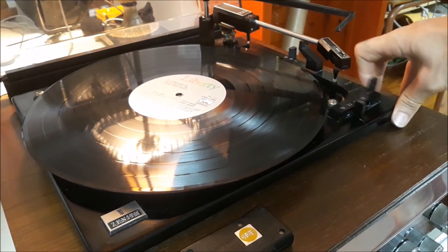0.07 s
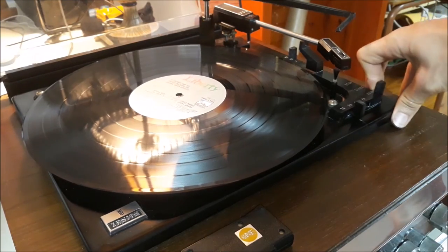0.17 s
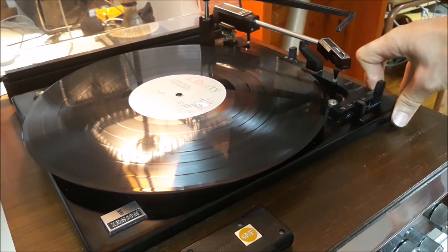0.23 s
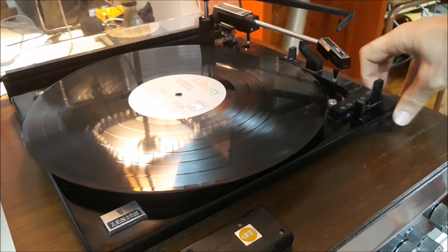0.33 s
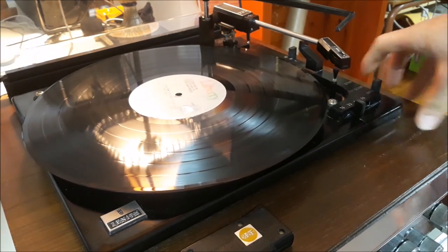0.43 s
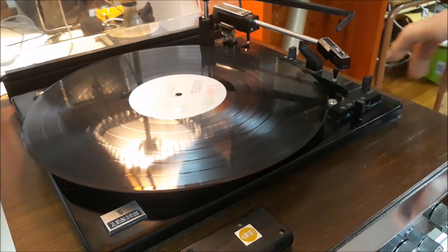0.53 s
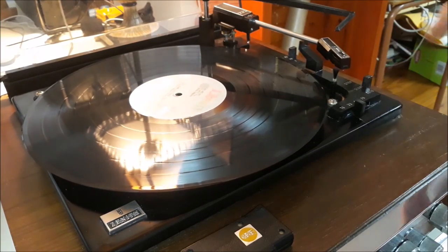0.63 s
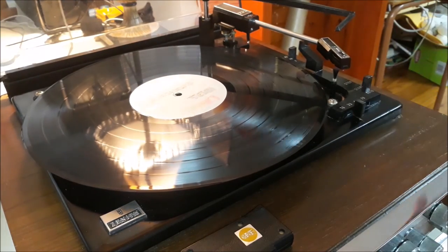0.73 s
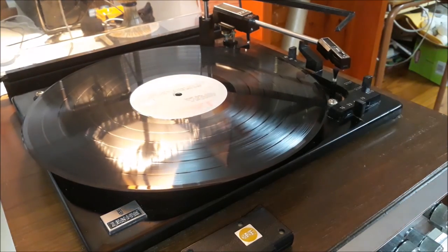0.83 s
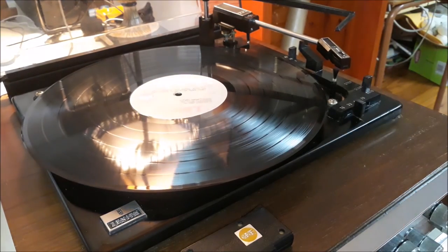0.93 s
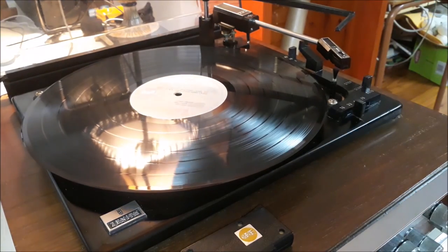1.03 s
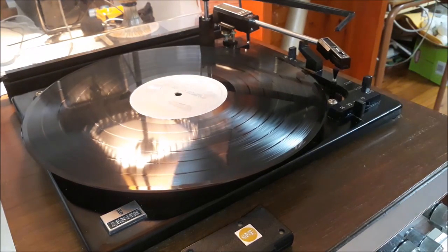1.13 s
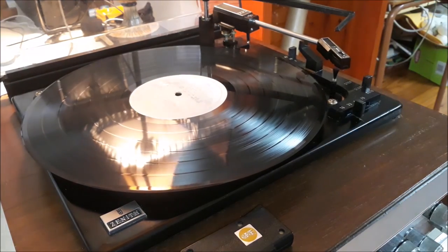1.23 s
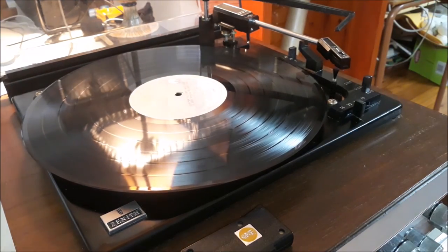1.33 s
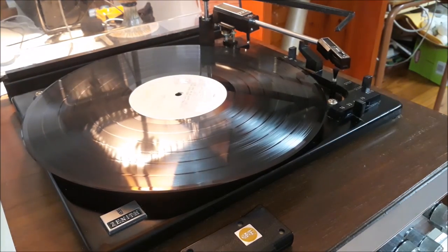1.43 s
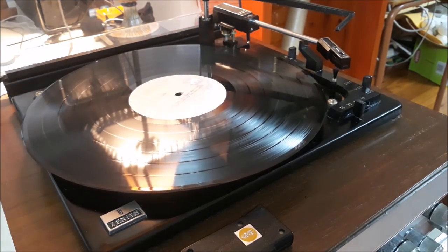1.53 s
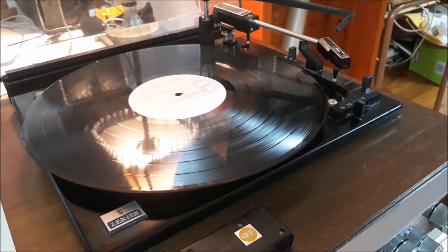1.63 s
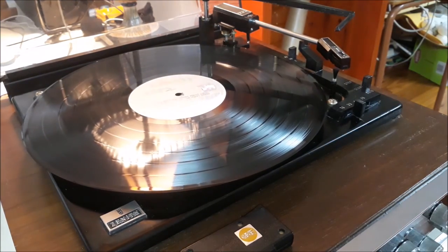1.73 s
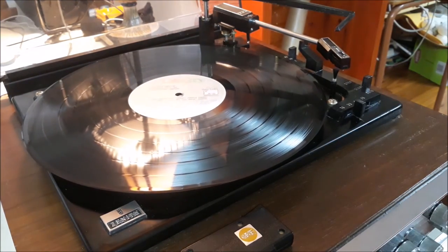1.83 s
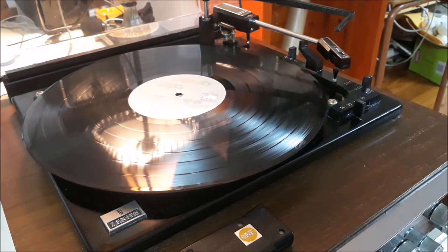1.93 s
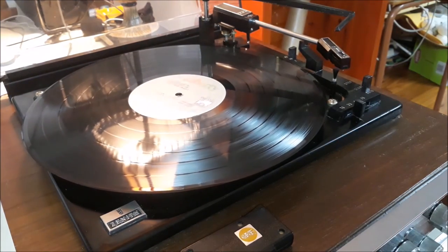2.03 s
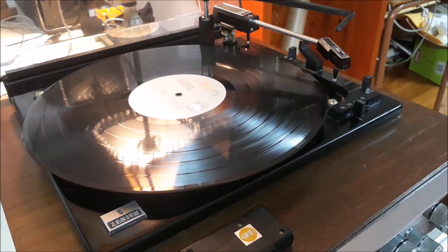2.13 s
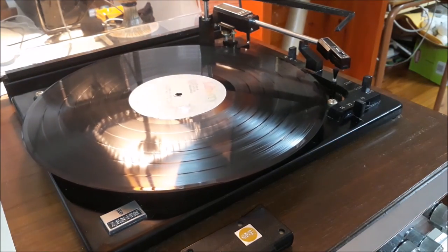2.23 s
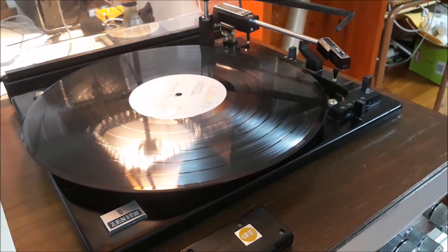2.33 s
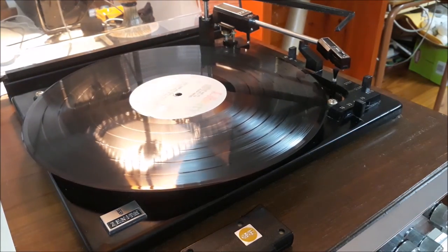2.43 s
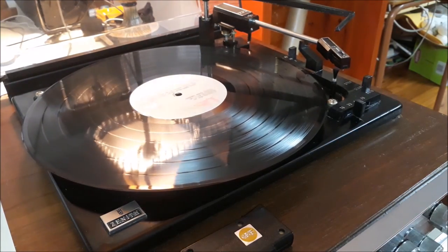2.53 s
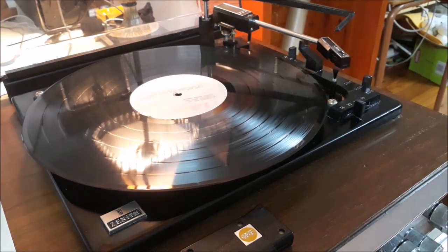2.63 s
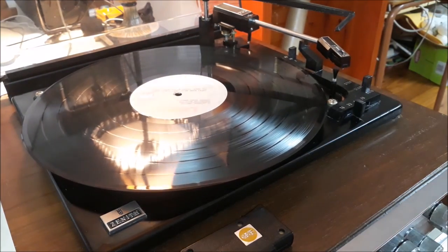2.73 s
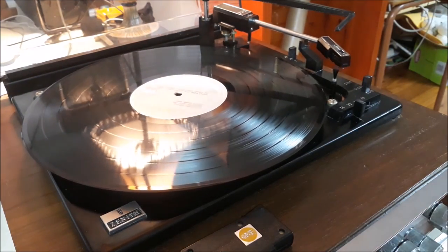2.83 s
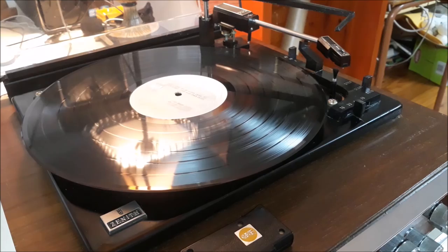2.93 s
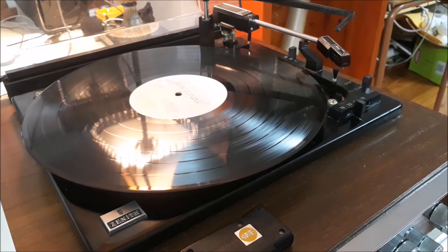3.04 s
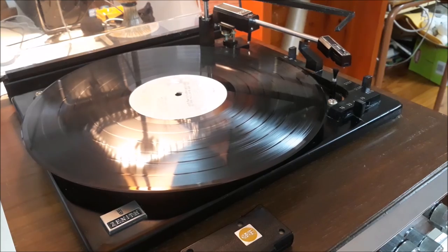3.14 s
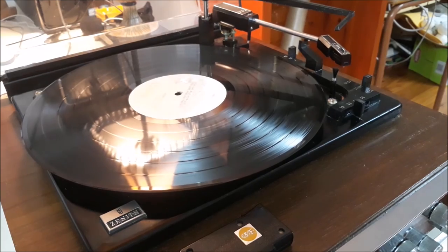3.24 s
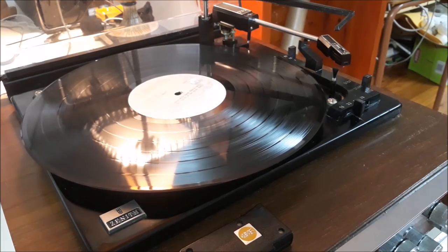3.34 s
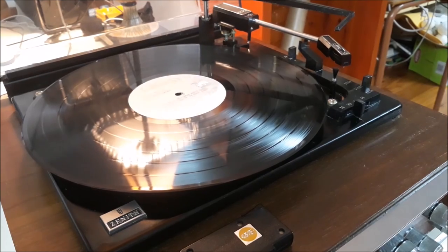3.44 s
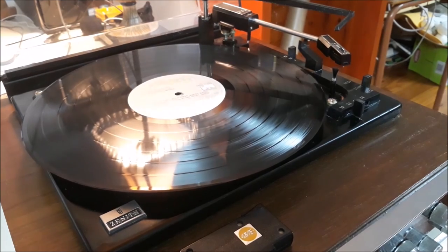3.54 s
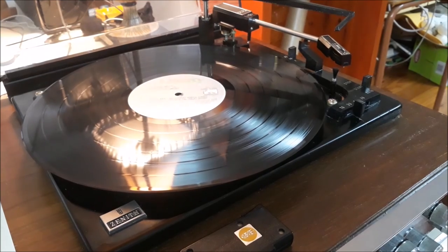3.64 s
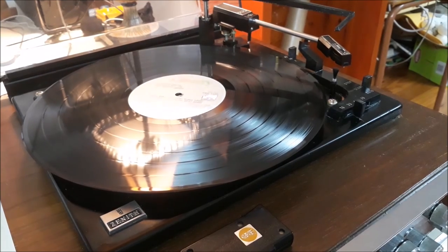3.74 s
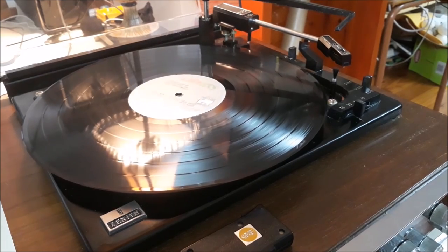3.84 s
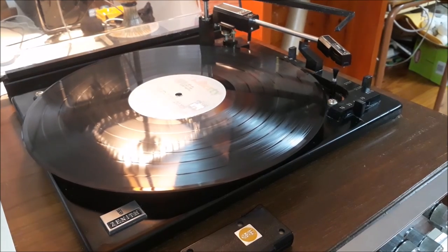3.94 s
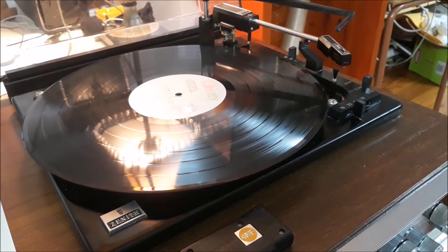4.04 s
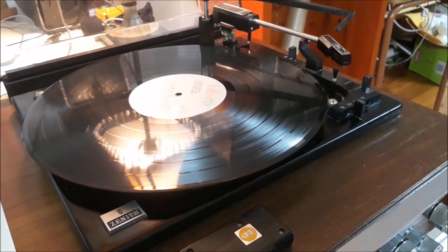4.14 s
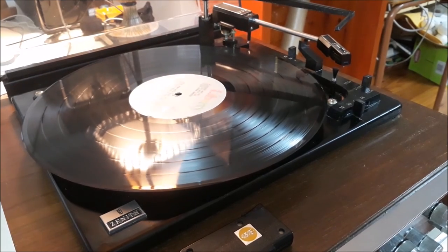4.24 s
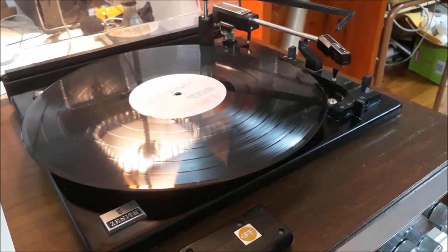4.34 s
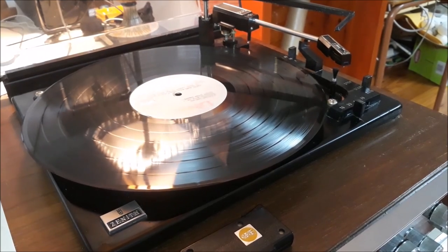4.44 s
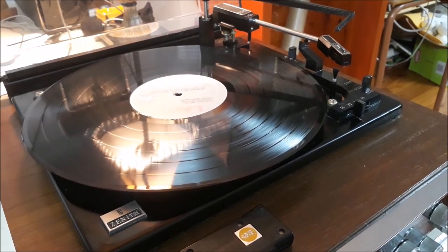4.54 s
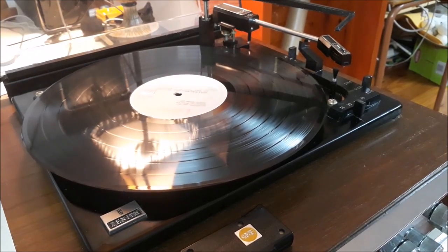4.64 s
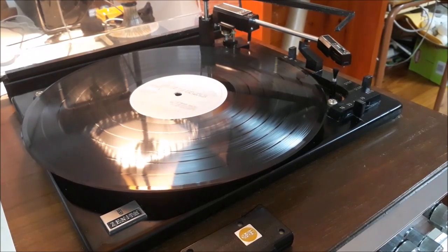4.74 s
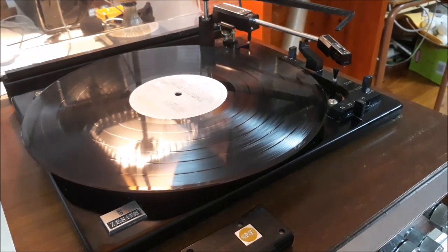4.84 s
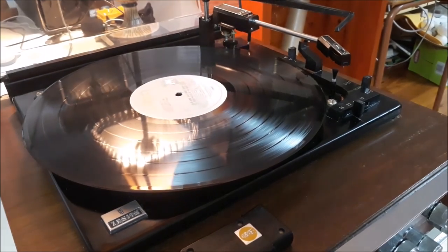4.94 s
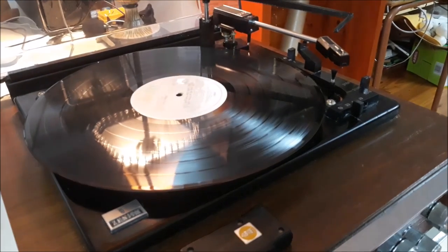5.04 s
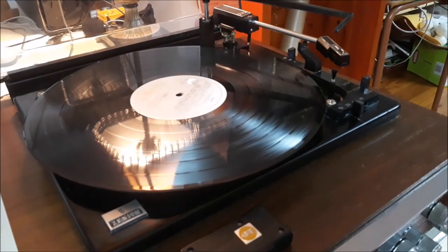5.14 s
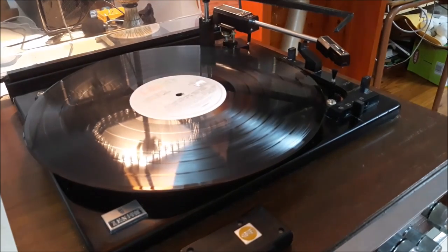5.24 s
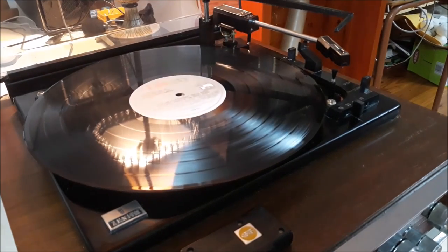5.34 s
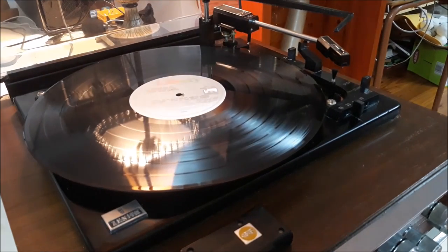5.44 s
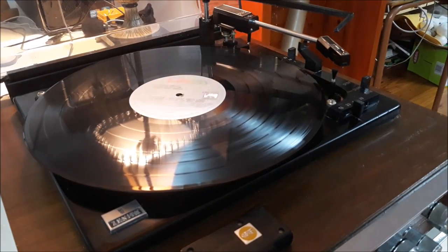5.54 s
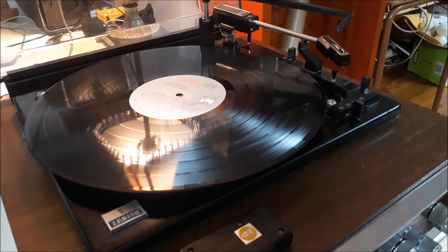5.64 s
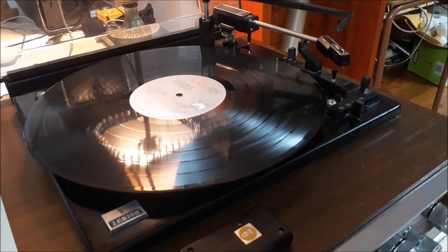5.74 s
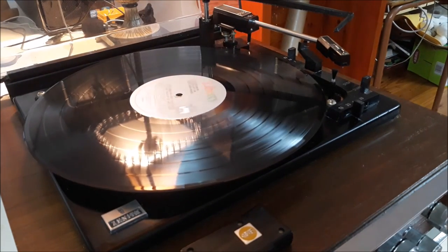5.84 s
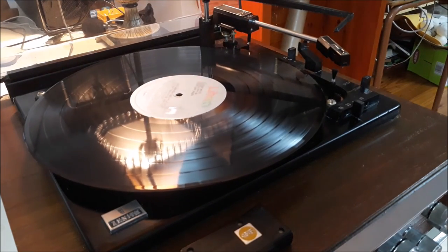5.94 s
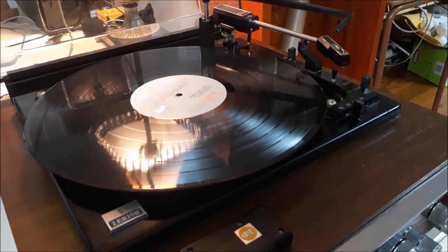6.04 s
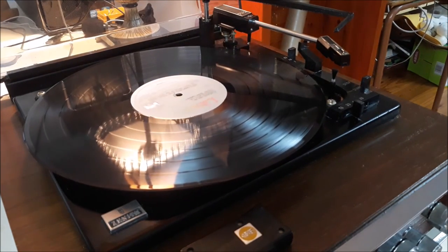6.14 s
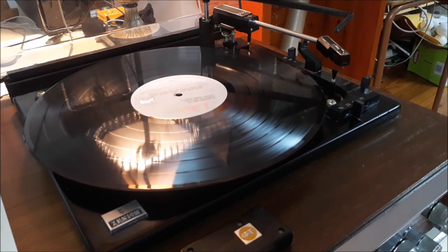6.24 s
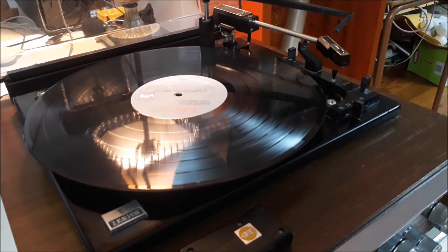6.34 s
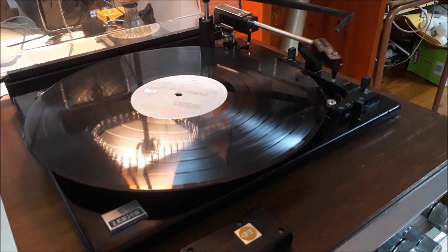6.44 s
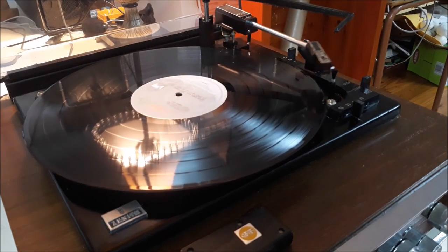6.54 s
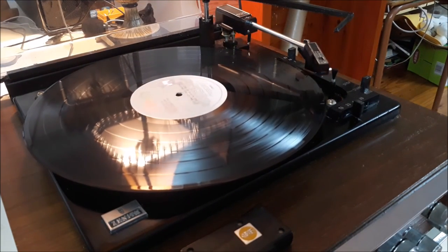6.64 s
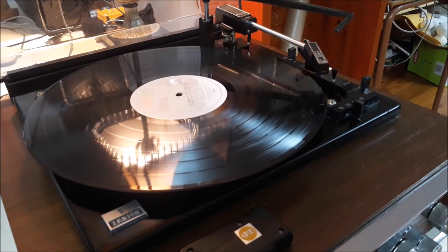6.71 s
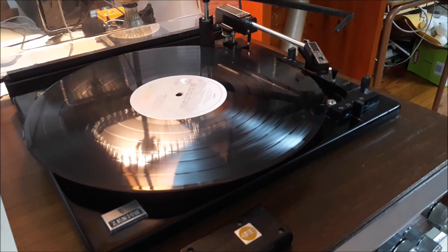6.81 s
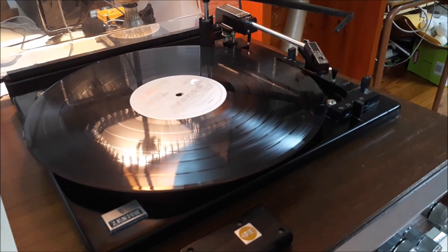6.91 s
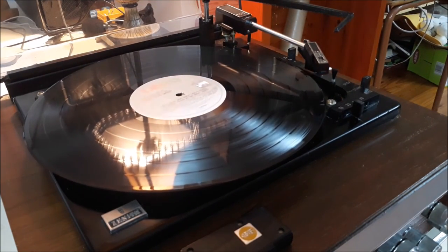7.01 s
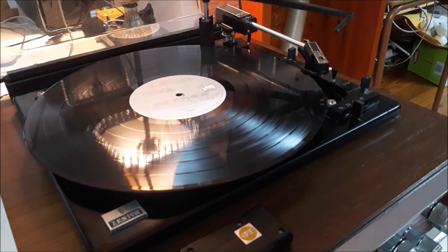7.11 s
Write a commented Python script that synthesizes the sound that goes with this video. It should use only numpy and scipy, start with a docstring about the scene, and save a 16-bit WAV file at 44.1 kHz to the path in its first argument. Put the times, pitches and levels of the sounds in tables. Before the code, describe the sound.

A stiff steel lever clacks over its catch and snaps back hard, then a record changer hums quietly with sparse ticks, knocks and one sharp latch click.

```python
"""In a small room, close by, a record changer stands on a wooden cabinet.
A finger drags the start lever over its catch and lets it snap back: steel contacts, sliding noise, springs.
The motor hums in wavering sines over rumble while the cam knocks, trips a steel latch and moves the tone arm,
each blow a burst of shaped noise with dying modes. Loud contacts duck the gain for over a second.
"""
import sys
import numpy as np
from scipy import signal
from scipy.fft import irfft
from scipy.io import wavfile
from scipy.ndimage import uniform_filter1d, minimum_filter1d

SR = 44100
rng = np.random.default_rng(int(sys.argv[2]) if len(sys.argv) > 2 else 0)


def put_to_file(sound):
    """Save the sound as 16-bit audio at rate SR, in the file named by the first command-line argument."""
    columns = np.atleast_2d(sound).T  # one column per channel
    safe = np.clip(columns, -1, 1)
    whole_steps = np.round(safe * 32767)
    wavfile.write(sys.argv[1], SR, whole_steps.astype(np.int16))


N = 316197
TIME = np.arange(N) / SR
EDGE_HZ = 15950  # upper edge of the audible band here

# Hiss spectrum, relative: [hz, level_db]; then its rms level in dB
HISS_SPECTRUM = [(880, -41), (1500, -13), (1810, -17), (1960, -17), (2970, -17.5), (3450, -11.5),
                 (5120, -16), (6690, -17), (7320, -17), (8160, -14), (9280, -21), (10800, -19.5),
                 (12600, -9), (13800, 0), (16000, -9)]
HISS_DB = -71
# Motor turning 50 times a second, and the mains buzz: [pitch_hz, rms_level_db]
MOTOR_LINES = [(100, -71), (120, -78.5), (149.9, -73), (199.8, -65.5), (301.7, -75.5), (259, -87)]
# Rumble spectrum of idler wheel and platter, relative: [hz, level_db]; then its mean level in dB rms
RUMBLE_SPECTRUM = [(20, -20), (55, -12.5), (78, -6), (100, 2), (135, -2.5), (220, -4), (275, -2.5),
                   (330, -10), (450, -15), (800, -19.5), (2000, -25), (5000, -41.5)]
RUMBLE_DB = -70
# Reverberation time of the room: [hz, t60_s]
ROOM_DECAY = [(200, 0.42), (550, 0.65), (1500, .52), (4000, 0.4), (8000, 0.38), (11000, .35), (15500, 0.52)]
# Starting spectrum of the reverberant tail, relative: [hz, level_db]
ROOM_COLOUR = [(100, -15), (280, -1), (700, 1.5), (4000, 2), (8000, 0), (11000, -1), (15500, -3)]
# Early echoes from cabinet and walls: [delay_s, level_db]
ECHOES = [(.0065, -13.5), (0.0108, -13.5), (0.032, -23.5), (0.0471, -18.5)]

# Modes of the plinth: [pitch_hz, level_db, t60_s]
PLINTH_MODES = [(262, -3, 0.18), (290, 0, .15), (346, -9.5, .1), (382, -11.5, .17), (464, -15, 0.26),
                (591, -17.5, 0.21), (697, -20.5, .16), (930, -23, 0.24), (1075, -21, 0.092)]
# Coil springs sing in clusters of close modes: [centre_hz, width_hz, level_db, t60_s]
SPRING_CLUSTERS = [(1730, 800, -19, .75), (4151, 1100, 2.5, 0.65), (7660, 1700, -3, 0.59),
                   (3970, 1700, -29, 2.5), (7850, 1300, -32.5, 2.9)]
# Colour of the steel linkage, relative: [hz, level_db]
STEEL_COLOUR = [(100, -27), (260, -11), (600, -6.5), (750, -8.5), (950, -2), (1450, -5), (1700, -0.5),
                (2400, -2.5), (2800, -1), (4300, 4), (8200, 2.5), (9800, -7.5), (12000, -4.5),
                (15500, -4.5)]
# Ringing modes of rods and springs: [pitch_hz, level_db, t60_s]
LINKAGE_MODES = [(1728, -7.5, 1), (2537, -5.5, 0.31), (3050, -10.5, 0.63), (4140, -2.5, 0.28),
                 (4707.4, -9.5, 0.36), (4888, -4.5, 0.49), (5500, -9.5, 0.49), (6300, -6, 0.47),
                 (6907, -6.5, 0.31), (8050, -1.5, 0.3), (8376, -4, 0.34), (8597, -1.5, 0.21),
                 (9383, -1, 0.18), (10440, -17, 0.28), (11140, -15, 0.34), (11910, -8.5, 0.27),
                 (13200, -15, 0.28), (13370, -14, 0.36), (14360, -5.5, 0.26), (14600, -4.5, 0.29),
                 (14830, 4, 0.19), (15310, -2.5, 0.19), (15580, -11, 0.28), (15710, -5, 0.2)]

# Slack in the linkage takes up with dry, unpitched ticks: [start_s, level_db]
TICKS = [(1.083, -41.5), (1.118, -42.5), (1.2641, -41.5), (2.318, -49.5), (3.515, -63.5), (3.805, -59),
         (3.934, -66), (4.305, -68), (6.977, -65)]
TICK_HZ, TICK_SPREAD, TICK_T60_S = 3250, 1.05, 0.021  # spread in octaves
TICK_THUMP_DB = -18  # relative to the tick's level
# The base plate answers every tick: spread in octaves, level relative to the tick
PLATE_HZ, PLATE_DB, PLATE_SPREAD, PLATE_T60_S = 1100, -7.5, 0.57, 0.047

# Cam, latch and arm parts knock: [start_s, level_db, pitch_hz, spread_octaves, thump_db]
KNOCKS = [(1.2019, -34, 1750, 0.64, -49), (2.317, -48, 3988, 0.33, -62.5), (3.0815, -51.5, 880, 0.54, -77),
          (3.224, -46, 880, 0.41, -43.5), (4.975, -23.5, 7320, .16, -77), (5.949, -44, 1780, 0.24, -52),
          (5.982, -54.5, 1700, 0.21, -75), (6.178, -66, 6000, .25, -91), (6.4088, -55, 3600, .2, -92),
          (6.530, -47, 1709, 0.27, -63.5), (6.597, -55.5, 3400, .35, -80), (6.703, -63, 430, .3, -62.5)]
KNOCK_T60_S, KNOCK_T60_SLOPE = 0.055, -0.54  # dying time at 1 kHz, and its power of the pitch
MOUNT_RATIO, MOUNT_DB, MOUNT_SPREAD = .47, -13, .45  # mount: share of the part's pitch, dB, octaves
KNOCK_TICK_DB = -14.5  # tick of contact, relative to the knock

# Sprung deck modes as the lever hits home: [pitch_hz, level_db, t60_s]
DECK_MODES = [(66.1, -32.5, .1), (95, -18, .08), (120, -16.5, 0.057), (172, -22, 0.027)]
DECK_START_S = .5192
# The lever grinds onto its catch, rides over it, slips from the finger, and slides to rest:
# [start_s, level_db, attack_s, hold_s, release_s]
SLIDES = [(0.045, -10, .003, .015, .014), (0.062, -15.5, .012, .042, .011), (.501, -29.5, .016, .002, .01),
          (.55, -55.5, .2, .17, .21)]
# The start lever clicks over its catch, and the finger shifts on it: [start_s, level_db, t60_s]
CLICKS = [(.003, -29.5, 0.041), (0.02, -35.5, 0.15), (0.0376, 2, 0.015), (0.0452, -6.5, .08),
          (0.0558, -5, 0.045), (0.1036, -3, .02), (0.1067, 4, .031), (0.3294, -32, 0.045),
          (.3635, -32, .035)]
CLICK_BODY_DB, CLICK_TOP_DB = 5, -.5  # lows and top treble, for a click of 0 dB
CLICK_THUMP_DB, CLICK_SPRING_DB = -32.5, -43.5  # plinth and springs, for a click of 0 dB
TOP_PER_DB, THUMP_PER_DB = 0.65, .55  # harder blows are brighter; thump grows more slowly than crack
# Springs snap the lever back, then the latch shut; body is below about 2 kHz, top above about 11 kHz:
# [start_s, level_db, contact_gap_s, body_db, top_db, thump_db, spring_db]
SNAPS = [(0.5194, 8, .0017, -2, 6.5, -33, -29.5), (4.974, -20, .0038, -4, 6.5, -46, -54.5)]
# In every snap the part trips, hits home, rebounds and settles: [delay_gaps, level_db, t60_s]
BOUNCES = [(-1, -12, .017), (0, 1.5, .014), (0.6, -8, .04), (3.5, -12, .036)]


def amp(db):
    """Level law: decibels to amplitude ratio."""
    return 10 ** (np.asarray(db) / 20)


def unit(x):
    """Normalisation: scales a signal to rms 1."""
    return x / np.sqrt(np.mean(x ** 2) + 1e-20)


def read(points, hz):
    """Interpolation: reads a table linearly along a log-frequency axis."""
    table_hz, value = np.transpose(points)
    return np.interp(np.log(hz + 1), np.log(table_hz + 1), value)


def add(mix, start_s, sound):
    """Superposition: sums a sound into the mix from a given time."""
    target = mix[max(round(start_s * SR), 0):][:len(sound)]
    target += sound[:len(target)]


def noise(shape, size):
    """Random-phase synthesis: noise of rms 1 with the spectrum shape(hz) in dB, below the band edge."""
    hz = np.fft.rfftfreq(size, 1 / SR)
    magnitude = amp(shape(hz)) * (hz < EDGE_HZ)
    phase = 2 * np.pi * rng.random(len(hz))
    return unit(irfft(magnitude * np.exp(1j * phase), size))


def drift(rate):
    """Random modulation: a wander of rms 1 through `rate` random knots a second."""
    knots = rng.standard_normal(int(rate * N / SR) + 2)
    return unit(np.interp(TIME * rate, np.arange(len(knots)), knots))


def ring(modes, longest):
    """Modal decay: dying sines, weighted differently at each blow, with t60 capped at `longest` s."""
    t = TIME[:round(.8 * SR)]
    out = np.zeros(len(t))
    for hz, db, t60 in modes:
        fade = amp(db + rng.uniform(-2, 3.2) - 60 * t / min(t60, longest))
        out += fade * np.sin(2 * np.pi * hz * t) * rng.choice([-1, 1])
    return out


def contact(shape, t60, rise):
    """High modal density: a blow into crowded, dying modes is a fading burst of shaped noise."""
    t = TIME[:8192]
    fade = amp(-60 * t / t60) * (1 - np.exp(-t / rise))
    burst = noise(shape, len(t)) * fade
    return burst * np.linalg.norm(fade) / np.linalg.norm(burst)


def thump(db, rise=0.0021):
    """Inertia: the plinth takes a few milliseconds to swing up under a blow."""
    modes = ring(PLINTH_MODES, longest=.2)
    return amp(db) * modes * (1 - np.exp(-TIME[:len(modes)] / rise))


def springs():
    """Stored vibration: coil springs ring on after a jolt in bands of close modes."""
    t = TIME[:round(1.5 * SR)]
    out = np.zeros(len(t))
    for centre_hz, width_hz, db, t60 in SPRING_CLUSTERS:
        def resonance(hz):
            return -20 * np.log10(1 + (2 * (hz - centre_hz) / width_hz) ** 2)
        out += amp(db - 60 * t / t60) * noise(resonance, len(t))
    return out


def part(db, centre_hz, spread, t60, skirt_db=15, after_db=-24, after_t60=0.36, note_db=-23, note_t60=0.12):
    """Local resonance: a dull blow around the pitch of the struck part, which rings on faintly."""
    def shape(hz):
        octaves = np.log2((hz + 1) / centre_hz)
        return -skirt_db * np.log(1 + (octaves / spread) ** 2 / 2)

    # a small part has a few distinct modes close around its pitch
    notes_hz = centre_hz * 2 ** (spread * rng.uniform(-0.19, 0.52, size=3))
    out = ring([(hz, note_db, note_t60) for hz in notes_hz], longest=.4)
    add(out, 0, contact(shape, t60, rise=0.0011))
    add(out, 0, amp(after_db) * contact(shape, after_t60, rise=0.003))
    return amp(db) * out


def tick(db):
    """Broadband contact: a dry, wide click with a short answer from the base plate."""
    click = part(db, TICK_HZ, TICK_SPREAD, TICK_T60_S)
    plate = part(db + PLATE_DB, PLATE_HZ, PLATE_SPREAD, PLATE_T60_S)
    return click + plate


def steel(db, t60, body_db, top_db, ring_db=-39, top_ring=1.7):
    """Hard impact: steel strikes steel in a crack that sets rods ringing."""
    tone = [(2200, body_db), (3400, 0), (8000, 0.0035), (11500, top_db)]
    crack = contact(lambda hz: read(STEEL_COLOUR, hz) + read(tone, hz), t60, rise=0.00047)
    # duller blows wake the highest modes less
    tilt = [(9000, 0), (13000, top_ring * min(top_db - 5, 0))]
    modes = [(hz, mode_db + read(tilt, hz), mode_t60) for hz, mode_db, mode_t60 in LINKAGE_MODES]
    out = amp(ring_db) * ring(modes, longest=.4)
    add(out, 0, crack)
    return amp(db) * out


def microphone_hiss():
    """Self-noise: the microphone's own steady, coloured hiss."""
    return amp(HISS_DB) * noise(lambda hz: read(HISS_SPECTRUM, hz), N)


def room(x, wet_db=-10.5, build=.012):
    """Reverberation by convolution: early echoes and a tail whose decay depends on frequency."""
    hz, t, grid = signal.stft(rng.standard_normal(SR), SR, nperseg=256)
    start_db = read(ROOM_COLOUR, hz)[:, None]
    grid = grid * amp(start_db - 60 * t / read(ROOM_DECAY, hz)[:, None])
    tail = signal.istft(grid, SR, nperseg=256)[1][:SR]
    tail = tail * (1 - np.exp(-TIME[:SR] / build))
    tail *= amp(wet_db) / np.linalg.norm(tail)
    for delay_s, db in ECHOES:
        add(tail, delay_s, amp([db]))
    return x + signal.fftconvolve(x, tail)[:N]


def motor(waver_db=0.5, wobble=0.12):
    """Periodic excitation: hum lines waver in level and phase over idler wheel and platter rumble."""
    hum = np.zeros(N)
    for hz, db in MOTOR_LINES:
        level = amp(db + waver_db * drift(rate=17)) * np.sqrt(2)  # rms to peak
        phase = 2 * np.pi * (hz * TIME + rng.random()) + wobble * drift(rate=9.8)
        hum += level * np.sin(phase)
    rumble = noise(lambda hz: read(RUMBLE_SPECTRUM, hz), N)
    return hum + rumble * amp(RUMBLE_DB + .9 * drift(rate=7.9))


def ticks():
    """Backlash: light contacts take up slack in the linkage, alike but for their strength."""
    out = np.zeros(N)
    for start_s, db in TICKS:
        add(out, start_s, tick(db))
        add(out, start_s, thump(db + TICK_THUMP_DB))
    return out


def knocks():
    """Coupled resonance: a tick of contact, part and mount ringing, and a thump in the plinth."""
    out = np.zeros(N)
    for start_s, db, hz, spread, thump_db in KNOCKS:
        t60 = KNOCK_T60_S * (hz / 1000) ** KNOCK_T60_SLOPE  # higher parts die sooner
        add(out, start_s, tick(db + KNOCK_TICK_DB))
        add(out, start_s, part(db, hz, spread, t60))
        add(out, start_s, part(db + MOUNT_DB, hz * MOUNT_RATIO, MOUNT_SPREAD, t60))
        add(out, start_s, thump(thump_db))
    return out


def lever_return():
    """Sprung mass: the deck rocks in low modes as the released lever hits home."""
    out = np.zeros(N)
    t = TIME[:SR // 2]
    rocking = sum(amp(db - 60 * t / t60) * np.cos(2 * np.pi * hz * t) for hz, db, t60 in DECK_MODES)
    add(out, DECK_START_S, (1 - np.exp(-t / 0.0013)) * rocking)
    return out


def scrape(grain_db=3, body_db=3, top_db=-1):
    """Sliding friction: many tiny slips of steel on steel; each stroke swells, holds and lets go."""
    tone = [(300, -2), (900, body_db), (2300, body_db), (3400, 0), (8000, 0), (11500, top_db)]
    force = np.zeros(N)
    for start_s, db, attack, hold, release in SLIDES:
        corners_s = start_s + np.cumsum([0, attack, hold, release])
        force += amp(db) * np.interp(TIME, corners_s, [0, 1, 1, 0]) ** 2
    grain = amp(grain_db * drift(rate=640))
    return force * grain * noise(lambda hz: read(STEEL_COLOUR, hz) + read(tone, hz), N)


def clicks():
    """Impact strength: it sets the brightness, spring ring and thump of single lever contacts."""
    out = np.zeros(N)
    for start_s, db, t60 in CLICKS:
        add(out, start_s, steel(db, t60, CLICK_BODY_DB, CLICK_TOP_DB + TOP_PER_DB * db))
        add(out, start_s, amp(CLICK_SPRING_DB + db) * springs())
        add(out, start_s, thump(CLICK_THUMP_DB + THUMP_PER_DB * db))
    return out


def snaps():
    """Rebound: a sprung part hits home in a quick bounce of contacts, jolting springs and plinth."""
    out = np.zeros(N)
    for start_s, db, gap_s, body_db, top_db, thump_db, spring_db in SNAPS:
        for gaps, bounce_db, t60 in BOUNCES:
            blow = steel(db + bounce_db, t60, body_db, top_db + TOP_PER_DB * bounce_db)
            add(out, start_s + gaps * gap_s, blow)
        add(out, start_s, amp(spring_db) * springs())
        add(out, start_s, thump(thump_db))
    return out


def scene():
    """Superposition: the mechanism with its room echo, then deck, motor and hiss without it."""
    mechanism = ticks() + knocks() + scrape() + clicks() + snaps()
    return (microphone_hiss() + motor() + room(mechanism) + lever_return())[None]


def record(dry, threshold_db=-21, depth_db=14, hold=1.12, recovery=0.12):
    """Gain control: loud contacts cut the gain at once, hold it (s), then let it recover (s)."""
    power = abs(uniform_filter1d(dry[0] ** 2, size=180))  # mean over about 4 ms
    power_db = 10 * np.log10(power + 1e-12)
    over_db = np.clip(power_db - threshold_db, 0, depth_db)
    # the largest excess of the past hold time
    span = 2 * round(hold * SR / 2) + 1
    held_db = -minimum_filter1d(-over_db, span, origin=span // 2, mode="constant")
    r = np.exp(-1 / (recovery * SR))
    duck_db = np.maximum(held_db, signal.lfilter([1 - r], [1, -r], held_db))
    rounded = np.tanh(dry * amp(-duck_db))  # soft peaks
    low_pass = signal.firwin(511, EDGE_HZ, window=("kaiser", 8), fs=SR)
    return signal.oaconvolve(rounded, low_pass[None], "same")


dry = scene()
out = record(dry)
put_to_file(out)
```